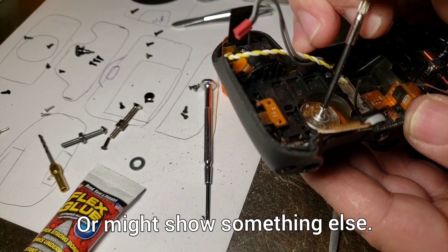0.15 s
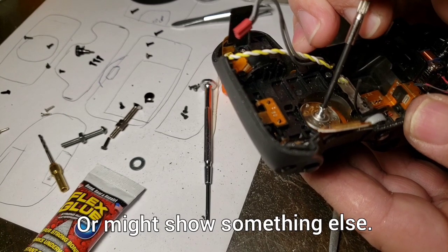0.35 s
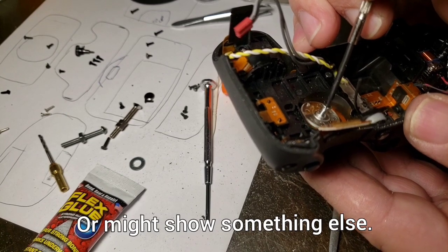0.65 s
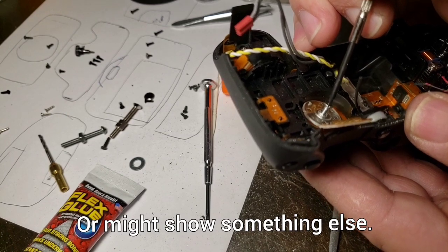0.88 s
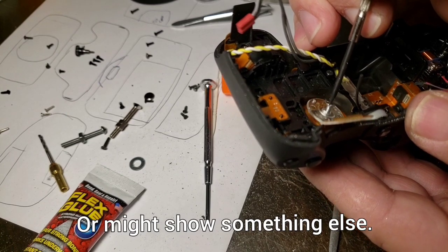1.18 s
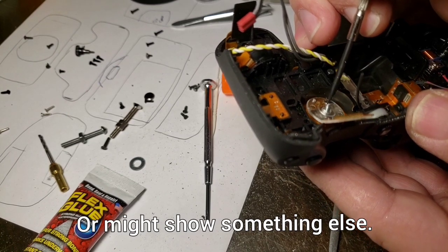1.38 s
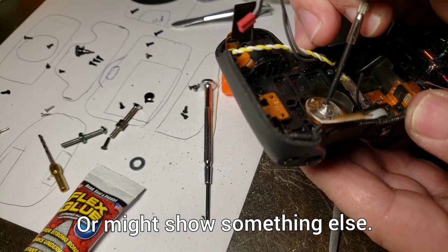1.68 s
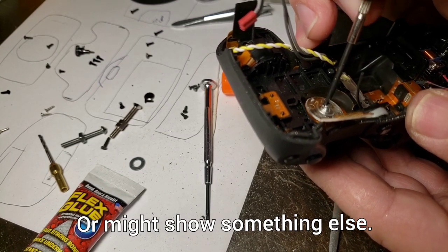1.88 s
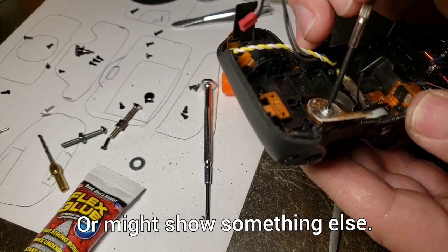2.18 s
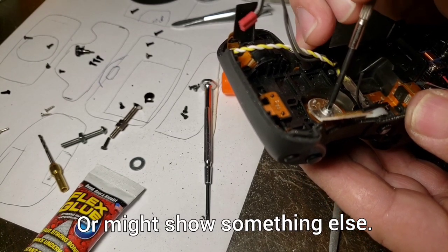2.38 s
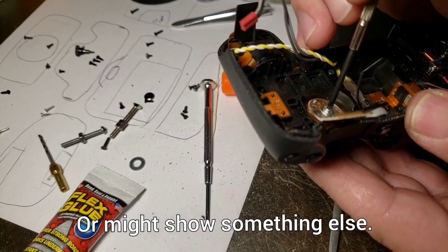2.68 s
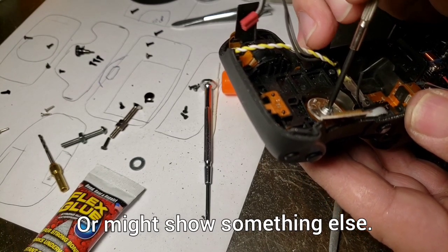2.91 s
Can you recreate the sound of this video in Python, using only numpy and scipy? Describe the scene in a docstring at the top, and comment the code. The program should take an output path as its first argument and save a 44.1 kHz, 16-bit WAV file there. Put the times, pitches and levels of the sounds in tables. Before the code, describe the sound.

Close stereo microphone in a small quiet room: tiny screwdriver scrapes and ticks grow into crisp metallic snaps, strongest around two seconds, then stop, leaving soft low handling rumble, room noise and hiss.

```python
"""From start to end, low handling rumble, room noise and microphone hiss lie under the scene.
From 0.6 s, close to the microphone and a little left, a fine screwdriver ticks and drags on a metal plate
inside an opened plastic camera body: short noise cracks and rattles ring the shaft and shell in a small room.
A brief low tone swells at 1.5 s; the tip slips off with a sharp double click near 1.9 s and again near 2.3 s.
A second low tone, higher and fainter, follows at 2.5 s."""
import sys
import numpy as np
from scipy import signal
from scipy.fft import rfft, irfft
from scipy.io import wavfile
from scipy.ndimage import uniform_filter1d

SR = 44100
rng = np.random.default_rng(int(sys.argv[2]) if len(sys.argv) > 2 else 0)


def digitize_waveform(pressure):
    """Quantize a signal to 16-bit integers and store it at the path in sys.argv[1].

    Rows of a 2-D input are taken as channels; values are limited to [-1, 1].
    """
    field = np.atleast_2d(pressure).T
    bounded = np.clip(field, -1, 1)
    quanta = np.round(bounded * 32767).astype(np.int16)
    wavfile.write(sys.argv[1], SR, quanta)


N = 134505

HANDLING_PAN_DB = 3.5  # left minus right


def undb(db):
    """Decibels to gain."""
    return 10 ** (np.asarray(db) / 20)


def unit(x):
    """Scale each channel to unit energy."""
    return x / np.sqrt(np.sum(x ** 2, axis=-1, keepdims=True) + 1e-18)


def pan(db):
    """Left and right gains for a left-minus-right level in dB, the left one held at 1."""
    return undb([[0], [-db]])


def on_log(points, hz):
    """Read (Hz, value) points on a log-frequency axis."""
    p = np.array(points, float)
    return np.interp(np.log(hz + 1), np.log(p[:, 0]), p[:, 1])


def colour(x, db_at, size=1024):
    """Causal minimum-phase filter whose gain in dB is db_at(Hz)."""
    gain = undb(db_at(np.fft.rfftfreq(size, 1 / SR)))
    # folding the cepstrum onto positive times gives the minimum phase
    cepstrum = irfft(np.log(gain))
    cepstrum[1:size // 2] *= 2
    cepstrum[size // 2 + 1:] = 0
    impulse = irfft(np.exp(rfft(cepstrum)))
    return signal.fftconvolve(x, impulse[None], axes=1)[:, :x.shape[1]]


def fade(t, t60):
    """Exponential decay, 60 dB down at t60."""
    return np.exp(-np.log(1000) * t / t60)


def resonant_noise(hz, width):
    """Noise of rms 1 through a resonance applied twice."""
    f = np.fft.rfftfreq(N, 1 / SR) + 1
    resonance = 1 / (1 + ((f * f - hz * hz) / (f * width)) ** 2)
    return np.sqrt(N) * unit(irfft(rfft(rng.standard_normal(N)) * resonance, N))


def add(out, start, x):
    """Mix x in from the given time in seconds."""
    i = int(start * SR)
    out[:, i:i + x.shape[1]] += x[:, :N - i]


def air():
    """Steady room noise, alike on both sides in the bass, with microphone hiss on top."""
    # spectrum of room noise and hiss: f/Hz, relative density level/dB
    spectrum = [(30, -13), (80, 0), (230, -7.5), (320, -7), (450, -16.5), (900, -15.5), (2000, -25),
                (4500, -30.5), (8500, -36), (10000, -31.5), (11500, -25), (15700, -22)]
    # likeness of the two sides: f/Hz, left-right correlation
    likeness = [(60, 1), (250, 0.59), (600, 0), (2000, 0), (8000, 0.066)]
    level_db, pan_db = -68, 1.3  # left channel rms, left minus right
    f = np.fft.rfftfreq(N, 1 / SR)
    mid, side = rfft(rng.standard_normal((2, N))) * undb(on_log(spectrum, f))
    alike = np.clip(on_log(likeness, f), -1, 1)
    opposite = np.array([[1], [-1]])
    both = mid * np.sqrt(1 + alike) + side * np.sqrt(1 - alike) * opposite
    return np.sqrt(N) * unit(irfft(both, N)) * undb(level_db) * pan(pan_db)


def handling():
    """Hand movements shake a deep resonance and a few higher ones."""
    # course of the deep rumble, before its trim: t/s, level/dB
    rumble_course = [(0.0, -58), (0.25, -67), (0.35, -50), (0.41, -92), (0.46, -61), (0.78, -51.5),
                     (1.1, -59), (1.44, -50), (1.56, -65), (1.65, -53.5), (2.13, -70), (2.5, -76.5),
                     (2.6, -47.5), (2.66, -44.5), (2.7, -65.5), (2.85, -52.5), (2.87, -62), (3.05, -60.5)]
    # course of the drone above it, before its trim: t/s, level/dB
    drone_course = [(0.0, -50), (0.05, -58), (1.2, -61), (1.25, -55), (1.43, -55), (1.52, -56),
                    (1.66, -58.5), (2.51, -65.5), (2.64, -57), (2.68, -69), (2.78, -61.5), (3.05, -69.5)]
    # resonances of the drone: f/Hz, width/Hz, relative level/dB
    drone_modes = [(76.7, 20, -1), (115.2, 31, 1.5), (146.6, 28, -8.5), (220, 60, -4)]
    rumble_hz, rumble_width_hz = 54, 12
    rumble_trim_db, drone_trim_db = -2.5, -2.5
    t = np.arange(N) / SR

    def even(x):
        """Level out the noise by its running rms over 0.1 s."""
        return x / np.sqrt(uniform_filter1d(x ** 2, size=SR // 10) + 1e-9)

    def follow(course):
        """Gain along a (s, dB) course."""
        return undb(np.interp(t, *np.array(course).T))

    rumble = even(resonant_noise(rumble_hz, rumble_width_hz)) * follow(rumble_course)
    drone = sum(undb(db) * resonant_noise(hz, width) for hz, width, db in drone_modes)
    drone = even(drone) * follow(drone_course)
    mix = undb(rumble_trim_db) * rumble + undb(drone_trim_db) * drone
    # the level difference is shared between the two sides
    return mix * pan(HANDLING_PAN_DB) * undb(HANDLING_PAN_DB / 2)


def low_tones():
    """Short, nearly pure low resonances that swell and fade as the body is handled."""
    # tones: t/s, length/s, mean f/Hz, left rms level at the middle of the swell/dB
    tones = [(1.457, 0.15, 97.4, -51), (2.5, 0.44, 209.7, -68.5)]
    waver = 0.014  # rms share of the pitch
    out = np.zeros((2, N))
    for start, length, hz, db in tones:
        t = np.arange(int(length * SR)) / SR
        pitch = hz * (1 + waver * resonant_noise(6.5, 27)[:len(t)])
        swell = np.sin(np.pi * t / length)
        tone = np.sin(2 * np.pi * np.cumsum(pitch) / SR)
        add(out, start, undb(db) * np.sqrt(2) * swell * tone * pan(HANDLING_PAN_DB))
    return out


def room(x):
    """A small room answers with a short diffuse tail, independent noise on each side."""
    # colour of the tail: f/Hz, gain/dB
    tail_colour = [(500, 5.5), (1800, 4), (3200, 0), (5200, 3.5), (7000, -3.5), (11500, -1.5), (15500, -8)]
    level_db, pan_db = -15, 3  # left minus right
    t60_s, build_s = 0.32, 0.0067
    t = np.arange(SR // 2) / SR
    envelope = fade(t, t60_s) * (1 - np.exp(-t / build_s))
    tail = unit(rng.standard_normal((2, len(t))) * envelope)
    tail = colour(tail, lambda f: on_log(tail_colour, f))
    source = x.sum(axis=0)[None]
    return undb(level_db) * pan(pan_db) * signal.fftconvolve(source, tail, axes=1)[:, :N]


def contact(shell_db, top_db, spot_hz):
    """One touch of steel: crack, brief rattle and ringing modes, coloured by the touched spot; unit energy."""
    # base colour of a contact: f/Hz, gain/dB
    base_colour = [(200, -57.5), (500, -29), (800, -27), (1300, -27.5), (2200, -28.5), (3200, -25),
                   (5500, -20), (7000, -15.5), (8800, -15.5), (10000, -14.5), (11600, -9.5), (12600, -8),
                   (14500, -1), (15600, -2.5), (17000, -6.5)]
    # ringing of shell, plate and shaft: f/Hz before the grip shifts it, relative level/dB, t60/s
    modes = [(782, -15.5, 0.094), (972, -25, 0.092), (1406, -21.5, 0.049), (1642, -13, 0.043),
             (1847, -15, 0.062), (2570, -14, 0.035), (5340, -20, 0.038), (6470, -14.5, 0.042),
             (6710, -11, 0.049), (10480, -24.5, 0.011), (10250, -29.5, 0.034), (14100, -19.5, 0.042),
             (14320, -14.5, 0.01)]
    crack_t60_s, rattle_t60_s = 0.0025, 0.045
    rattle_db, ring_db = 0.5, 2  # against the crack
    shell_hz, top_treble_hz = 2960, 11800  # shelf corners
    spot_gain_db, spot_width_hz = 9, 600
    t = np.arange(SR // 4) / SR
    crack = unit(rng.standard_normal((2, len(t))) * fade(t, crack_t60_s))
    rattle = unit(rng.standard_normal((2, len(t))) * fade(t, rattle_t60_s))
    # the changing grip shifts all the modes together from touch to touch
    grip = 1 + 0.018 * rng.standard_normal()
    ring = 0
    for hz, db, t60 in modes:
        wave = np.sin(2 * np.pi * (hz * grip * t + rng.random((2, 1))))
        ring = ring + undb(db) * unit(wave * fade(t, t60))

    def tone(f):
        """Gain in dB: base colour, low shelf of the shell, top treble shelf and peak of the spot."""
        shell = shell_db / (1 + (f / shell_hz) ** 4)
        top = top_db / (1 + (top_treble_hz / (f + 1)) ** 8)
        spot = spot_gain_db / (1 + ((f - spot_hz) / spot_width_hz) ** 2)
        return on_log(base_colour, f) + shell + top + spot

    return unit(colour(crack + undb(rattle_db) * rattle + undb(ring_db) * ring, tone))


def drags():
    """The tip sticks and slips over the plate: a run of tiny uneven contacts."""
    # drags: t/s, length/s, left level (energy packed into the length)/dB, swell over the drag/dB,
    # mean catches per s, shell share/dB, top treble share/dB, touched spot f/Hz, left minus right/dB
    drag_list = [(0.582, 0.07, -72.5, -5, 2000, 15, -1, 6700, 10),
                 (0.675, 0.074, -72, -9, 1070, 21.5, -8, 6400, 5.5),
                 (1.073, 0.024, -71, -2, 1700, -10, -26, 6800, 3),
                 (1.089, 0.0092, -47.5, 31, 2100, -12, 5, 6550, 20),
                 (1.377, 0.025, -56.5, 13, 1700, -1, -5.5, 6900, 8),
                 (1.411, .04, -55, 3, 1200, 10.5, -0.5, 6300, 8),
                 (1.504, .048, -63, 0, 1500, -3, 0.5, 6540, 5),
                 (1.561, 0.069, -61.5, -21, 540, 9, -3, 15450, 6),
                 (1.889, 0.024, -57.5, 16, 3900, 12, -10, 10100, 11),
                 (1.917, .021, -30.5, 5.5, 4700, 4, -1, 10070, 33),
                 (1.933, 0.024, -29, 6.5, 5300, 8, 2, 9900, 17),
                 (1.968, 0.025, -45, -17, 3900, 0.5, -13, 6550, 14)]
    out = np.zeros((2, N))
    t = np.arange(SR // 8) / SR
    for start, length, db, swell_db, rate, shell_db, top_db, spot_hz, pan_db in drag_list:
        caught = rng.random(len(t)) < rate / SR
        size = rng.standard_normal(len(t))
        swell = undb(swell_db * np.minimum(t / length, 1))
        catches = caught * (t < length) * size * swell
        scrape = unit(signal.fftconvolve(catches[None], contact(shell_db, top_db, spot_hz), axes=1))
        add(out, start, undb(db) * np.sqrt(length * SR) * pan(pan_db) * scrape)
    return out


def taps():
    """Single blows of the tip; the level is that of their energy packed into 2 ms."""
    # blows: t/s, left level/dB, shell share/dB, top treble share/dB, touched spot f/Hz, left minus right/dB
    blows = [(.599, -57, 6, -3, 15100, 4), (0.604, -65, 3, 2, 15000, 12), (.6975, -64, 26, -7, 6550, 3),
             (0.701, -66, 17, -19, 6500, -6), (0.714, -63, 21, -20, 6700, 2), (1.099, -41, -3, 0, 6500, 9),
             (1.1145, -40, -30, -1, 6600, 14), (1.117, -40.5, 26, 16.5, 6950, 1),
             (1.1306, -31, -8.5, -5.5, 7600, 0.5), (1.133, -27.5, -5.5, -2, 7040, 6),
             (1.1395, -42, -35, 24, 7600, -7), (1.402, -39, -8, -15, 7000, 8),
             (1.4067, -45, -29, -5, 7500, -4), (1.422, -43, 3, 0, 6660, 22), (1.445, -42, -5, 2, 6940, 10),
             (1.494, -32.5, -23, 16, 14800, 4), (1.497, -41.5, -4, -2, 12500, 3),
             (1.5535, -55, -9, 3, 15000, -2), (1.9362, -21.5, 0, -0.5, 10000, 6.5),
             (1.939, -21.5, 7, 0, 14500, 5), (1.951, -23.5, 0, -10, 9900, 14),
             (1.9531, -18, 2.5, -3.5, 15000, 14), (1.957, -31.5, 3.5, -11, 5330, 2),
             (2.2537, -34, 2, -10.5, 11300, -2), (2.2551, -18.5, -7, -0.5, 15600, 13),
             (2.275, -29.5, 4, -0.5, 11250, -3.5), (2.2767, -17, -3, -2.5, 15060, 22)]
    out = np.zeros((2, N))
    packed = np.sqrt(.002 * SR)
    for start, db, shell_db, top_db, spot_hz, pan_db in blows:
        add(out, start, undb(db) * packed * pan(pan_db) * contact(shell_db, top_db, spot_hz))
    return out


def scene():
    """The background, then the screwdriver at work and its room."""
    background = air() + handling() + low_tones()
    tool = drags() + taps()
    return background + room(tool) + tool


def record(dry):
    """The recorder cuts the top steeply with an elliptic low-pass."""
    cut_hz, ripple_db, stop_db = 15850, .2, 70
    low_pass = signal.ellip(10, ripple_db, stop_db, cut_hz, fs=SR, output="sos")
    return signal.sosfilt(low_pass, dry)


dry = scene()
out = record(dry)
digitize_waveform(out)
```